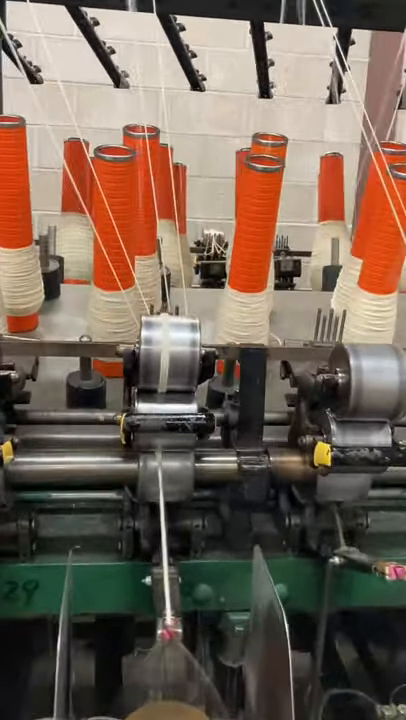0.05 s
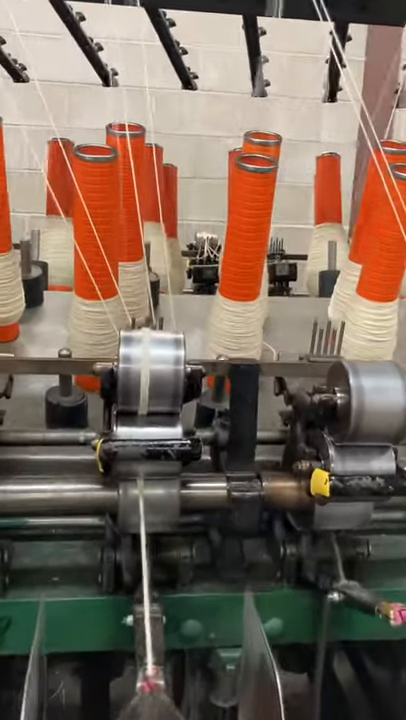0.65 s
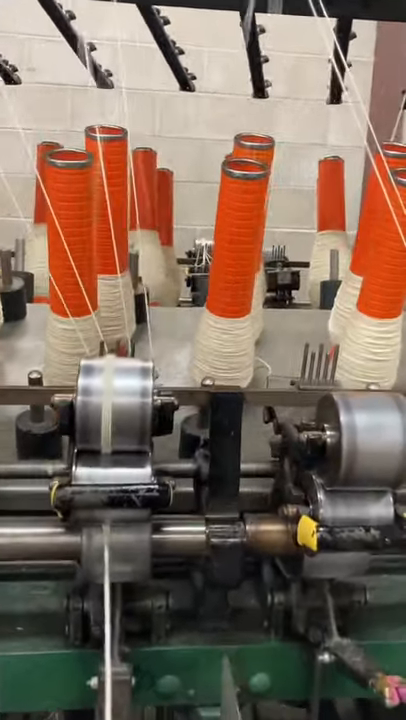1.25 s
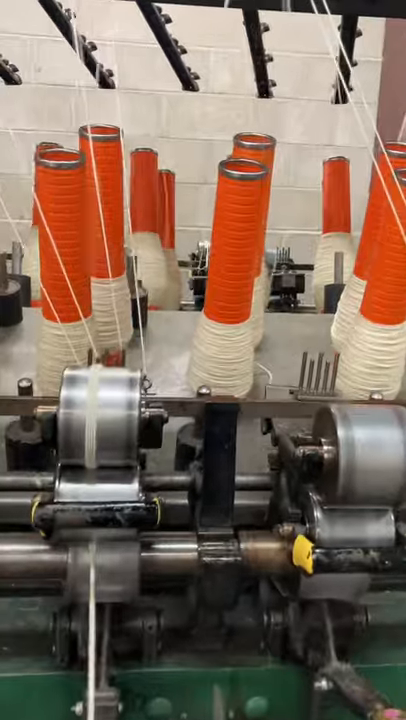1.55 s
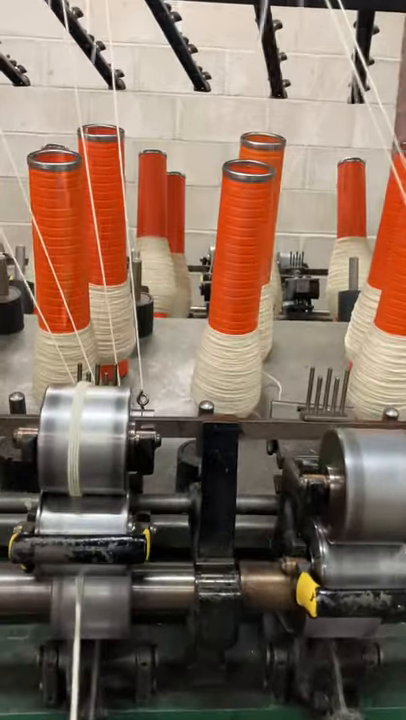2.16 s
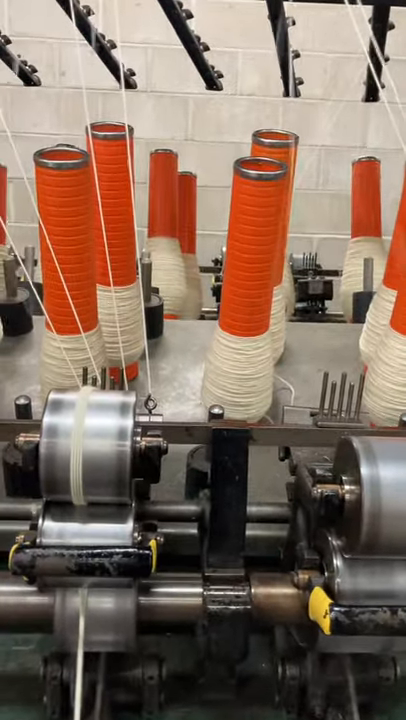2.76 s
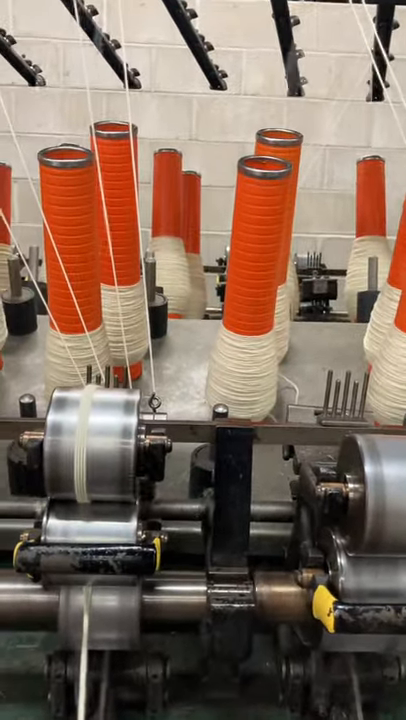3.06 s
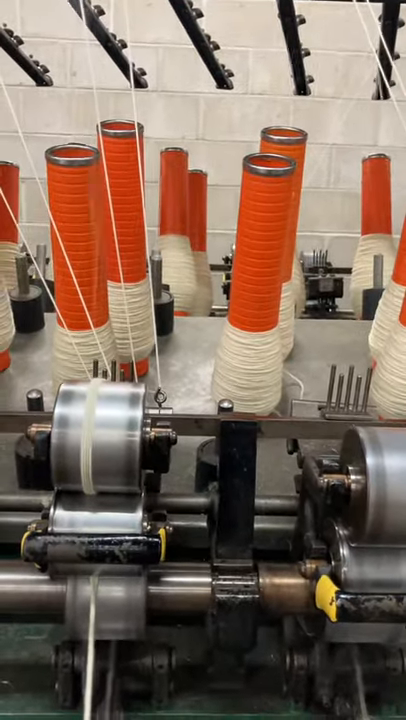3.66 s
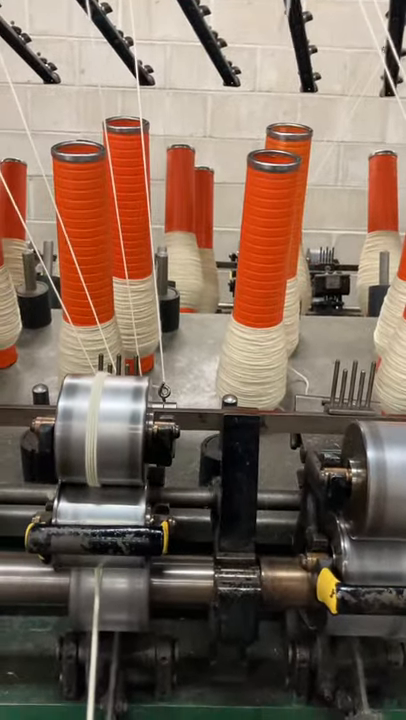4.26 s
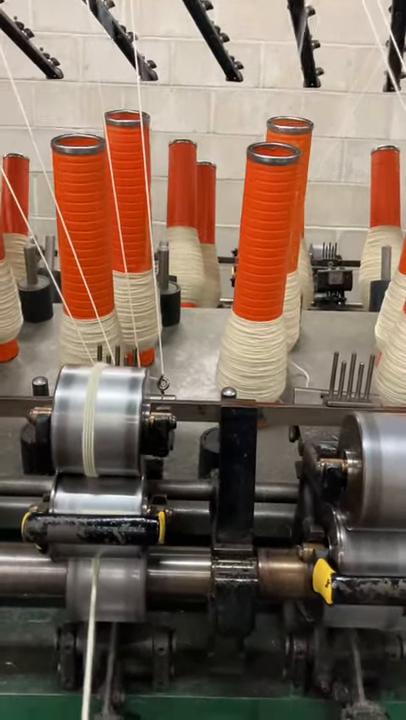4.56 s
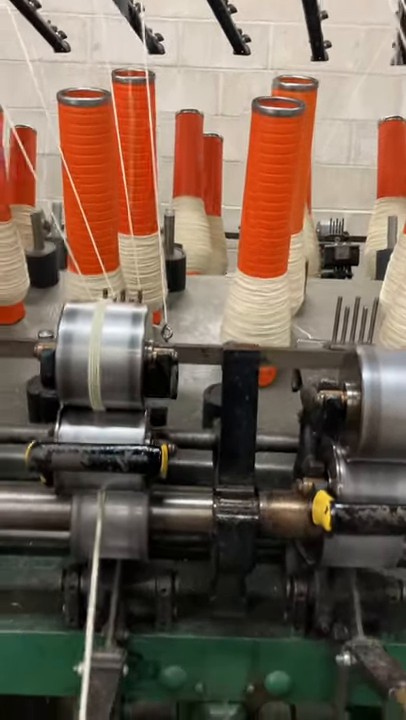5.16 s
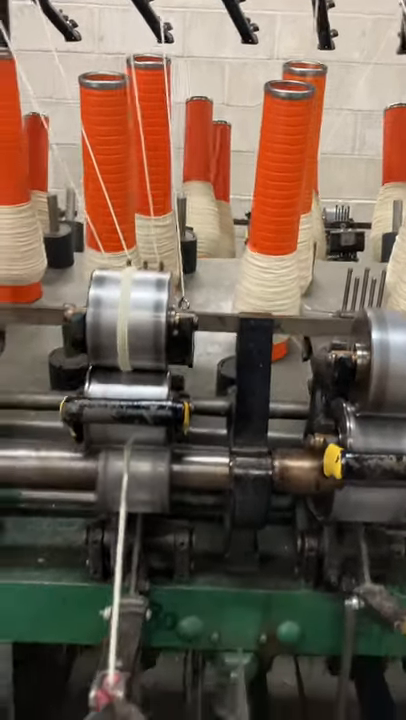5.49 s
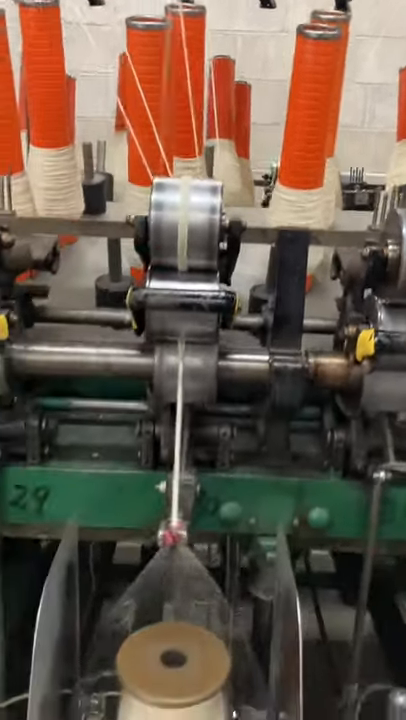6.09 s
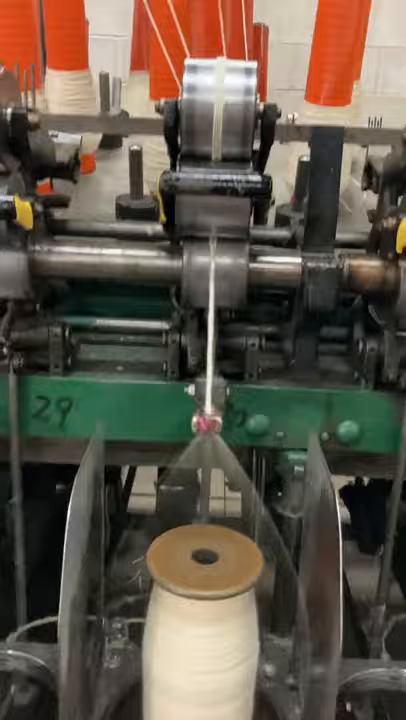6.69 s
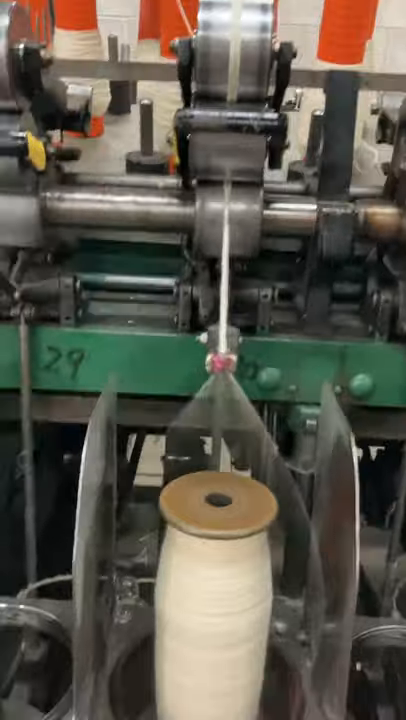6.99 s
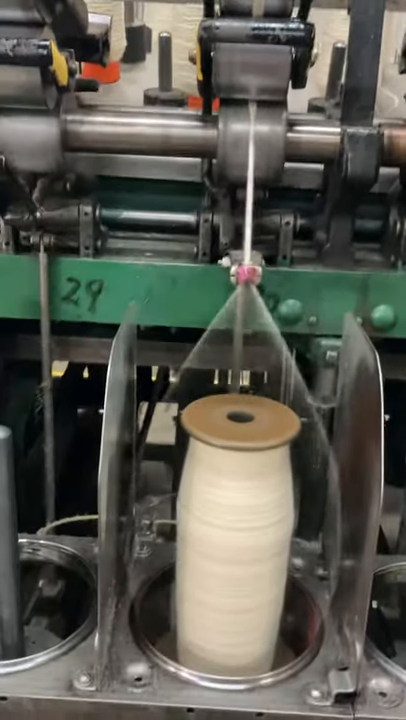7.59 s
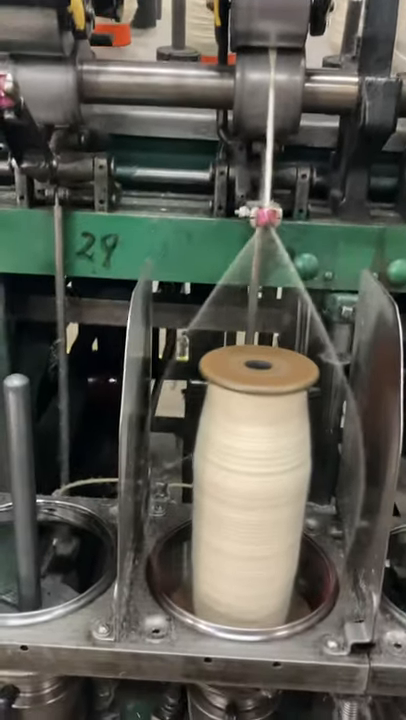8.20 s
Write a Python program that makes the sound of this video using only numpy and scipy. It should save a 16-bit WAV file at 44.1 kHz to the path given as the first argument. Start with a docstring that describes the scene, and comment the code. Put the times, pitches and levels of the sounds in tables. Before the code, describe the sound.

Rows of spinning textile spindles roar and whirr in a mill hall, with a throbbing hum, bright hiss and a few sharp clicks.

```python
"""Ring twisting machine in a mill hall

Rows of spindles roar, hum and whirr, gears whine and loose parts clink. Travellers, the small clips
that guide the yarn round steel rings, hiss as they slide, tick once a turn and sometimes sing.
A few sharp clicks stand out; late on, the hiss comes nearer and there are two dull bumps.
It is all heard through two closely spaced microphone openings, left and right."""
import sys
import numpy as np
from scipy import signal
from scipy.fft import rfft, irfft
from scipy.io import wavfile
from scipy.ndimage import uniform_filter1d

SR = 44100
rng = np.random.default_rng(int(sys.argv[2]) if len(sys.argv) > 2 else 0)


def wav_out(sig):
    """Save sig, one row per channel (or a flat mono array), as 16-bit PCM at SR to the path in sys.argv[1]."""
    wavfile.write(sys.argv[1], SR, np.round(np.clip(np.atleast_2d(sig).T, -1, 1) * 32767).astype(np.int16))


N = 367794
T = np.arange(N) / SR
HZ = np.fft.rfftfreq(N, 1 / SR)
TURN_HZ = 57.2  # spindle turns a second
BASS_LEFT_DB = 1.5  # how much louder the bass is on the left than on the right


def gain_of(db):
    """Turns decibels into a number to multiply a sound by."""
    return 10 ** (np.asarray(db) / 20)


def unit_level(x):
    """Scales a signal to an average size (rms) of one."""
    return x / np.sqrt(np.mean(x ** 2) + 1e-20)


def follow(points):
    """Joins (time, value) points with straight lines, giving a value for every sample."""
    return np.interp(T, *np.transpose(points))


def swell(peak_s, half_s):
    """A smooth rise and fall around one moment."""
    return np.exp(-np.minimum(((T - peak_s) / half_s) ** 2, 50))


def drift(rate_hz):
    """A random wobble of average size one; a higher rate makes it quicker."""
    return unit_level(irfft(rfft(rng.standard_normal(N)) * np.exp(-(HZ / rate_hz) ** 2), N))


def shaped_noise(spectrum):
    """Two unrelated noises that follow a list of (frequency, level in each 1 Hz band)."""
    hz, db = np.transpose(spectrum)
    colour = gain_of(np.interp(np.log(HZ + 1), np.log(hz), db))
    return irfft(rfft(rng.standard_normal((2, N))) * colour, N) * np.sqrt(SR / 2)


def resonance(hz, width_hz):
    """Two unrelated noises ringing around one pitch; the narrower, the more like a note."""
    colour = 1 / (1 + (2 * (HZ - hz) / width_hz) ** 2)
    return unit_level(irfft(rfft(rng.standard_normal((2, N))) * colour, N))


def hall_roar(churn_hz=320, churn_half_width_hz=160):
    """All the spindles roar together, the frame rings along and the bobbins churn the air."""
    # the roar of the whole hall: f/Hz, level in a 1 Hz band/dB
    spectrum = [(22, -100), (42, -73), (75, -61.5), (115, -58.5), (190, -54.5), (280, -54), (480, -56),
                (600, -60), (850, -61.5), (1150, -62.5), (2000, -64.5), (2600, -64.5), (3800, -68.5),
                (5200, -69), (9000, -150), (16000, -115)]
    # pitches at which the frame and guards ring: f/Hz, width/Hz, level/dB
    frame_notes = [(124.2, 47, -38), (213, 15, -42.5), (237, 10, -42.5), (329.4, 17, -43),
                   (710, 170, -41.5), (1795, 58, -46), (2980, 320, -42)]
    # how the churned air rises and falls: t/s, level change/dB
    churn = [(0, -1.5), (1.2, -1.5), (2, -1.5), (3, 0), (4.3, -1.5), (5.2, -1), (6.3, -1.8), (7.3, -2.2),
             (8.34, -4)]
    roar = shaped_noise(spectrum)
    roar += sum(gain_of(db) * resonance(hz, width) for hz, width, db in frame_notes)
    churned_air = irfft(rfft(roar) / (1 + ((HZ - churn_hz) / churn_half_width_hz) ** 6), N)
    return roar + churned_air * (gain_of(follow(churn)) - 1)  # only this band changes level


def spindle_hum(hum_trim_db=-0.1, wander_db=2.0, beat_trim_db=-2.5):
    """Unbalanced spindles hum once a turn; their tones at three times that pitch beat and throb."""
    # the deep hum: t/s, relative level/dB
    hum_levels = [(0.04, -50), (0.12, -35), (.24, -40), (0.64, -40), (0.72, -54), (.9, -42), (1.15, -43),
                  (1.55, -44), (1.9, -47), (2.45, -43), (2.57, -41.5), (2.8, -44), (3.2, -40),
                  (3.62, -34.5), (3.76, -50), (3.87, -41), (4.25, -37), (4.62, -43), (4.78, -34),
                  (4.98, -47), (5.13, -38), (5.24, -47), (5.7, -51), (5.79, -41), (5.92, -51), (6.3, -51),
                  (6.6, -37), (6.88, -34), (7.18, -35), (7.29, -48), (7.55, -42), (7.88, -40), (7.95, -48),
                  (8.12, -41), (8.3, -35)]
    # throbs as the spindles fall into step: peak t/s, half length/s, level/dB
    throbs = [(0.562, 0.065, -29.5), (0.85, 0.05, -29.5), (1.07, 0.05, -28), (2.84, 0.045, -32),
              (3.16, 0.046, -31.5), (4.43, 0.057, -34), (5.25, 0.16, -39), (5.83, 0.065, -31),
              (6.214, 0.063, -32.5), (6.43, 0.087, -36.5), (6.72, 0.092, -30), (7.13, 0.058, -34),
              (7.647, .05, -31), (7.842, 0.057, -30.5)]
    # spindles at slightly different speeds: speed above TURN_HZ/Hz, relative level/dB
    beating_spindles = [(-1.1, -43.5), (.15, -45), (1.3, -46)]
    turns = TURN_HZ * T + .11 * drift(4)
    hum_db = follow(hum_levels) + hum_trim_db + wander_db * drift(6.5)
    sound = gain_of(hum_db) * np.sin(2 * np.pi * turns)
    sound += sum(gain_of(db) * swell(s, half) for s, half, db in throbs) * np.sin(6 * np.pi * turns)
    for extra_hz, db in beating_spindles:
        turns = (TURN_HZ + extra_hz) * T + rng.random() + 0.051 * drift(2.6)
        sound += gain_of(db + beat_trim_db) * np.sin(6 * np.pi * turns)
    return np.sqrt(2) * sound


def gear_whine(drive_hz=446.3, drive_trim_db=1.45, flutter_db=1.6, drive_waver=0.045):
    """Meshing teeth give wavering tones; the main drive is loudest and steadiest in pitch."""
    # the main drive as the microphone moves: t/s, relative level/dB
    drive_levels = [(0, -37), (.55, -38), (1.15, -36), (1.28, -40), (1.45, -37.5), (2.1, -43.5), (2.4, -36),
                    (2.6, -37), (2.8, -46), (3.2, -37), (3.35, -36), (3.55, -41), (3.9, -37.5), (4.2, -37),
                    (4.4, -44), (4.6, -36), (5, -37.5), (5.45, -36), (5.6, -46), (5.75, -38.5), (6.4, -37),
                    (6.75, -44), (8.34, -41)]
    # fainter gear tones: f/Hz, level/dB, waver/cycles
    faint_tones = [(659, -53.5, .2), (707.5, -46.5, .12), (1297, -51.5, .08), (1806, -55, .5),
                   (2406, -56, .3)]
    drive_db = follow(drive_levels) + drive_trim_db + flutter_db * drift(11)
    sound = np.zeros(N)
    for hz, db, waver in [(drive_hz, drive_db, drive_waver), *faint_tones]:
        cycles = hz * T + waver * drift(11.6)
        sound += gain_of(db) * np.sin(2 * np.pi * cycles)
    return np.sqrt(2) * sound


def ring_hiss(near_share=0.81, trim_db=0.54, flutter_db=0.59):
    """Travellers hiss round the rings, fluttering with the pull of the yarn, and sometimes squeal."""
    # yarn and travellers sliding: f/Hz, relative level in a 1 Hz band/dB
    spectrum = [(2500, -90), (4500, -76), (5500, -72), (6300, -69.3), (7300, -68), (8100, -65.2),
                (9400, -64.2), (11200, -65.8), (13000, -68), (14600, -69), (15800, -70.5)]
    # how near the rings are, of which the hiss follows a share: t/s, relative level/dB
    nearness = [(0, -33.5), (4.2, -32.5), (6.4, -30), (8.34, -30)]
    # squeals of single travellers: peak t/s, half length/s, f/Hz, width/Hz, level/dB
    squeals = [(1.3, .04, 2950, 200, -40), (1.7, .03, 2850, 200, -36), (2.93, .025, 2980, 150, -36),
               (7.2, .04, 2950, 200, -40), (4.45, .04, 2950, 250, -38), (5.42, .05, 2930, 160, -36.5),
               (3.66, .03, 1830, 90, -39), (6.75, .18, 1790, 70, -43), (4.85, .3, 7970, 90, -42),
               (5.42, .2, 7946, 75, -36), (6.52, .42, 8826, 90, -33), (5.95, .4, 6290, 100, -39.5),
               (6.14, .1, 7410, 70, -41), (7.45, .2, 7410, 70, -42), (8.3, .06, 7390, 70, -39)]
    near = follow(nearness)
    near_db = near_share * (near - near.mean())
    sound = shaped_noise(spectrum) * gain_of(trim_db + near_db + flutter_db * drift(25))
    for s, half, hz, width, db in squeals:
        sound += resonance(hz, width) * gain_of(db) * swell(s, half)
    return sound


def bearing_whirr(spacing_hz=57.03, width_hz=17):
    """Many bearings at nearly one speed give thin metallic tones at multiples of their turning rate."""
    # the outline of the tones' peaks: f/Hz, level in a 1 Hz band/dB
    spectrum = [(900, -79), (1170, -64.5), (1310, -76), (1420, -67), (1700, -69), (1900, -64.5),
                (2100, -63.5), (2400, -64), (2520, -67), (2850, -69), (3050, -65), (3500, -71), (4700, -75),
                (5500, -81)]
    off_tone_hz = (HZ + spacing_hz / 2) % spacing_hz - spacing_hz / 2
    return irfft(rfft(shaped_noise(spectrum)) / (1 + (2 * off_tone_hz / width_hz) ** 2), N)


def rattle(clinks_per_s=9, decay_s=0.014, pitch_spread=0.0453):
    """Loose metal parts clink at random, each clink a little off the pitch of its kind."""
    # kinds of loose guides and guards: f/Hz, average level/dB
    loose_parts = [(1150, -50), (1480, -50), (2560, -50), (2900, -47.5), (3140, -49), (3700, -52)]
    sound = np.zeros((2, N))
    age = np.arange(SR // 8) / SR
    fade = np.exp(-age / decay_s)
    for hz, db in loose_parts:
        clinks = np.zeros((2, N + len(age)))
        for when, size, detune, left, right in rng.random((round(clinks_per_s * N / SR), 5)):
            pitch = hz * (1 + pitch_spread * (2 * detune - 1))
            cycles = pitch * age + np.array([[left], [right]])
            start = int(when * N)
            clinks[:, start:start + len(age)] += (1 + size) * fade * np.sin(2 * np.pi * cycles)
        sound += gain_of(db) * unit_level(clinks[:, :N])
    return sound


def traveller_ticks(tick_s=.001, jitter_turns=0.0074, unevenness=0.4):
    """Each traveller scrapes one spot of its ring every turn: a fine buzz of uneven ticks."""
    # spindles that pass close by:
    # speed above TURN_HZ/Hz, nearest t/s, half time in earshot/s, level/dB, f/Hz, half width/Hz
    spindles = [(-0.22, .7, 1.5, -40, 14500, 2500), (0.058, .4, 1.6, -37.5, 9800, 1100),
                (-0.16, 0.81, 1.1, -38, 15000, 2800), (-.45, 6.3, .17, -35.5, 14300, 1300),
                (-0.22, 7.4, 0.88, -36, 13500, 2500), (.13, 8.9, 6.5, -37.5, 9000, 510)]
    sound = np.zeros((2, N))
    for extra_hz, nearest_s, earshot_s, db, hz, half_width in spindles:
        rate = TURN_HZ + extra_hz
        turns = rate * T + rng.random() + jitter_turns * drift(7) + 1
        strength = 1 + unevenness * rng.uniform(-1.1, 1, N)[turns.astype(int)]  # one for each turn
        age = (turns % 1) / rate / tick_s
        ticks = unit_level(strength * age * np.exp(-2 * age))
        closeness = 1 / (1 + ((T - nearest_s) / earshot_s) ** 4)
        sound += resonance(hz, 2 * half_width) * ticks * gain_of(db) * closeness
    return sound


def whistle(hz, jitter_hz=54, throb=.45, roughness=.3):
    """A rough note with a shaky pitch: the traveller grips and slips once a turn."""
    pitch = hz + jitter_hz / 2 * np.array([drift(jitter_hz), drift(jitter_hz)])
    grip = 1 + throb * np.sin(2 * np.pi * (TURN_HZ * T + rng.random()))
    grip += roughness * drift(2 * jitter_hz)
    return unit_level(grip * np.sin(2 * np.pi * np.cumsum(pitch, axis=1) / SR))


def ring_song(ring_hz=4490, fade_s=.05, flutter_db=1.0, chirp_trim_db=1.0):
    """All the rings chatter faintly at nearly one note; at times one holds a purer note or chirps."""
    # all the rings together: t/s, level/dB
    chorus = [(0, -46), (1.5, -46.5), (2, -49), (4.1, -48), (4.6, -46), (5.5, -45.5), (6.2, -43),
              (8.34, -44.5)]
    # soft notes held by one ring: start t/s, length/s, f/Hz, level/dB
    held_notes = [(.03, .54, 4465, -40.5), (3.5, .7, 4495, -45), (4.18, 1.1, 4505, -41.3),
                  (7.42, 1.0, 4440, -40.5)]
    # short chirps: peak t/s, half length/s, f/Hz, relative level/dB
    chirps = [(.13, .025, 4410, -39), (.24, .025, 4500, -38.5), (1.35, .025, 4410, -39),
              (1.44, .025, 4410, -40.5), (4.38, .035, 4520, -38), (4.635, .016, 4505, -38),
              (4.705, .028, 4505, -36.5), (4.84, .03, 4500, -40), (4.98, .03, 4520, -40.5),
              (5.08, .03, 4510, -40), (5.16, .025, 4480, -37.5), (5.71, .035, 4470, -38),
              (6.86, .03, 4470, -39), (7.26, .035, 4470, -38), (7.48, .025, 4435, -38),
              (7.73, .025, 4410, -36.5), (7.82, .022, 4500, -37), (8.03, .035, 4410, -39.5),
              (8.12, .025, 4435, -37), (8.31, .02, 4410, -37)]
    sound = resonance(ring_hz, width_hz=105) * gain_of(follow(chorus))
    for s, length, hz, db in held_notes:
        fade = np.clip(np.minimum(T - s, s + length - T) / fade_s, 0, 1)
        sound += whistle(hz) * gain_of(db) * fade
    sound *= gain_of(flutter_db * drift(30))
    times, _, pitches, _ = np.transpose(chirps)
    nearest_chirp = np.searchsorted((times[1:] + times[:-1]) / 2, T)
    bursts = sum(gain_of(db + chirp_trim_db) * swell(s, half) for s, half, _, db in chirps)
    return sound + bursts * whistle(pitches[nearest_chirp])


def sharp_clicks(decay_s=.0007):
    """Sharp, bright clicks, each a tiny burst of noise; one is a loud traveller tick."""
    # sharp clicks: t/s, peak level/dB
    clicks = [(0.115, -28.5), (6.2706, -15), (6.3894, -12), (7.3093, -12), (7.328, -8), (7.9523, -5)]
    bursts = sum(gain_of(db) * (T >= s) * np.exp(-abs(T - s) / decay_s) for s, db in clicks)
    return bursts * np.tanh(resonance(11000, width_hz=7000))


def bumps(rise_s=0.012):
    """Soft low knocks, each a few waves long."""
    # dull knocks: start t/s, f/Hz, peak level/dB
    knocks = [(6.304, 126, -16), (6.374, 140, -27)]
    sound = np.zeros(N)
    for s, hz, db in knocks:
        age = np.maximum(T - s, 0)
        rise_and_fall = (age / rise_s * np.exp(1 - age / rise_s)) ** 2
        sound += gain_of(db) * rise_and_fall * np.sin(2 * np.pi * hz * age)
    return sound


def reflections(pair, fine_db=1.8, broad_db=0.6, flutter_db=1.0):
    """Random shifting peaks and dips mimic echoes off metal as the microphone moves; the noise flutters."""
    hz, _, slices = signal.stft(pair, SR, nperseg=2048)
    fine, broad, flutter = rng.standard_normal((3, *slices.shape[1:]))
    fine = fine - uniform_filter1d(fine, size=7, axis=0)  # axis 0 is frequency, axis 1 is time
    fine = unit_level(uniform_filter1d(fine, size=60, axis=1, mode="wrap"))
    broad = unit_level(uniform_filter1d(uniform_filter1d(broad, size=8, axis=0), size=10, axis=1))
    flutter = unit_level(uniform_filter1d(uniform_filter1d(flutter, size=16, axis=0), size=3, axis=1))
    above_bass = np.minimum(hz / 1100, 1)[:, None]
    change_db = above_bass * (fine_db * fine + broad_db * broad) + flutter_db * flutter
    return signal.istft(slices * gain_of(change_db), nperseg=2048)[1][:, :N]


def microphone_openings(pair):
    """Most pitches reach the left opening first, and scattered sound differs between the two."""
    # how the two sides compare: f/Hz, likeness (0-1), lead of the left/radians
    sides = [(100, .99, 0), (400, .95, -.3), (750, .46, -.3), (1600, .55, .7), (2400, .2, 2.2),
             (4100, .3, 1.6), (5300, .96, 2.98), (5900, .98, 3.27), (6600, .72, 4.2), (8200, .99, 6.3),
             (9800, .8, 7.4), (11200, .99, 9.3), (12200, .99, 9.55), (13200, .7, 10.8), (14400, .98, 12.5)]
    hz, *columns = np.transpose(sides)
    likeness, lead = (np.interp(HZ, hz, column) for column in columns)
    left, scattered = rfft(pair)
    right = (likeness * left + np.sqrt(1 - likeness ** 2) * scattered) * np.exp(-1j * lead)
    bass_tilt = gain_of(BASS_LEFT_DB / 2 / (1 + (HZ / 480) ** 6))
    return irfft(np.array([left * bass_tilt, right / bass_tilt]), N)


def scene():
    """Noises spread over both sides; hum, gears and bumps sit slightly to the left."""
    lean_left = gain_of(np.array([[1], [-1]]) * BASS_LEFT_DB / 2)
    tones = (spindle_hum() + gear_whine() + bumps()) * lean_left
    noises = reflections(hall_roar() + ring_hiss())
    noises = noises + bearing_whirr() + rattle() + traveller_ticks() + sharp_clicks()
    return microphone_openings(noises) + ring_song() + tones


def record(dry):
    """Cuts away the very highest treble, above 15800 Hz."""
    low_pass = signal.firwin(511, 15800, window=("kaiser", 9), fs=SR)
    return signal.oaconvolve(dry, low_pass[None], "same")


dry = scene()
out = record(dry)
wav_out(out)
```